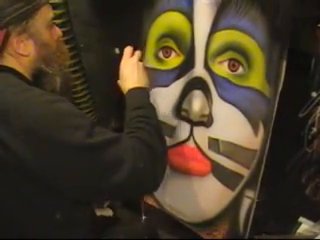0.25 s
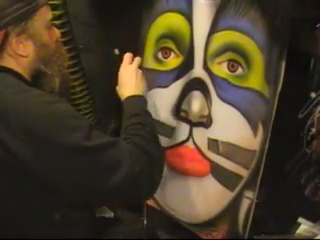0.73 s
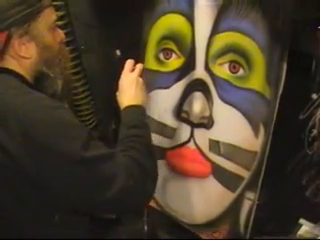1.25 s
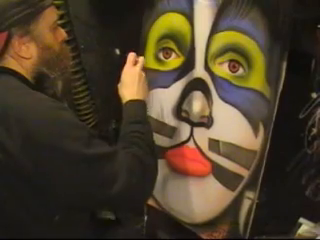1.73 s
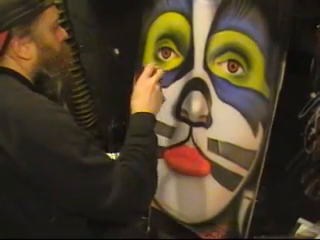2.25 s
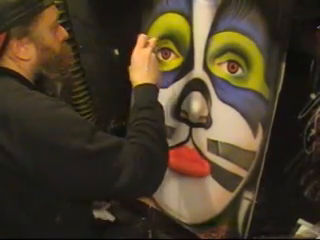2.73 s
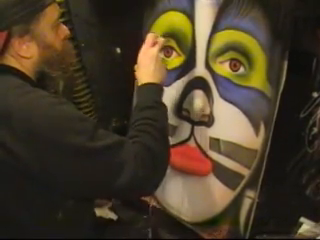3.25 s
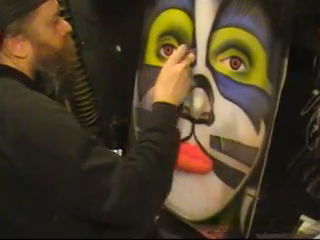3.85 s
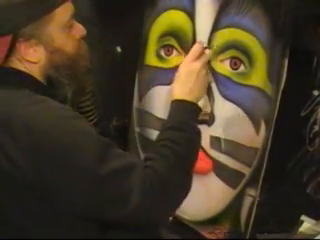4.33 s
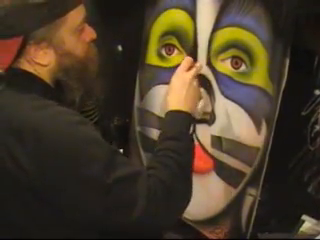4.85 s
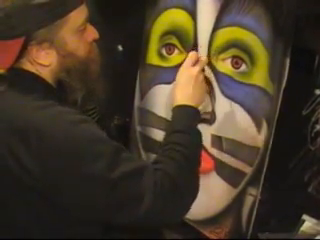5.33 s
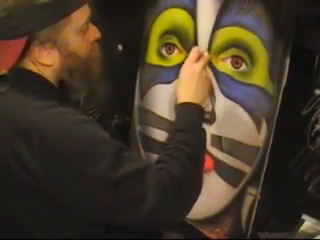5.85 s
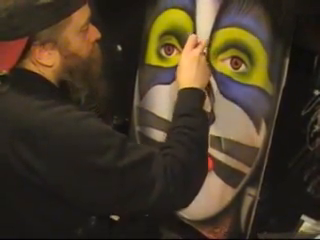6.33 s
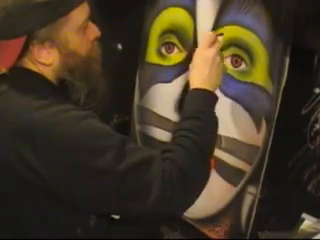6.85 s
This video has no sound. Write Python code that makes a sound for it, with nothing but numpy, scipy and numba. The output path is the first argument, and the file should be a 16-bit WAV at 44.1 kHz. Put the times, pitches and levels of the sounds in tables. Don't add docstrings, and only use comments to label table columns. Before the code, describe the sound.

The sound begins mid-stroke: an airbrush close to the microphone gives a bright, dense hiss, strongest in the upper treble, with a breathy roar and a wavering ring around the nozzle. The ring dips and surges several times a second as paint flow changes. Soft gusty drumming from the canvas accompanies it, mainly from 0 to 2 s. At about 2.25 s the air shuts off, bleeding away in under a tenth of a second, and snaps back at 2.45. It stops again at 3.5; a short, duller spit comes at 3.85, then a fuller, louder stroke from 3.95, fluctuating until 5.75. After a gap of about 0.2 s the final stroke starts at 5.95 and continues through the end near 7.1 s, swelling slightly. Beneath everything lie a low uneven fan rumble, faint air noise and a thin tape-motor whine, in a small room with a very short tail.

```python
import sys
import numpy as np
from scipy import signal
from scipy.fft import rfft, irfft
from scipy.io import wavfile
from scipy.ndimage import uniform_filter1d, map_coordinates
from numba import njit

SR = 44100
rng = np.random.default_rng(int(sys.argv[2]) if len(sys.argv) > 2 else 0)


def linear_from_db(decibels):
    return 10 ** (np.asarray(decibels, float) / 20)


def master_out(mix):
    frames = np.transpose(np.atleast_2d(mix))
    ceiling = np.clip(frames, -1, 1)
    pcm = np.round(ceiling * 32767).astype(np.int16)
    wavfile.write(sys.argv[1], SR, pcm)


N = 312655

# (time [s], air level [dB])
FACING = [(0, -26), (.9, -27), (1.5, -26), (1.7, -27.5), (2.2, -25), (2.55, -24.5), (2.72, -27),
          (3.6, -24.5), (3.97, -22), (4.5, -21.5), (4.97, -24), (5.15, -22.5), (5.5, -23), (5.7, -22),
          (6, -24.5), (6.45, -22.5), (6.7, -24), (7.06, -20.5)]
# (time [s], cap resonance [Hz], lower crest [Hz], upper crest [Hz])
HAND = [(0, 4500, 6040, 9100), (.75, 4680, 6240, 9400), (.95, 4700, 6340, 10500), (1.7, 4560, 6400, 10200),
        (2.2, 4785, 7350, 9950), (2.7, 4600, 6200, 9000), (3.5, 4600, 6700, 10240), (4, 4380, 6570, 9970),
        (4.3, 4200, 5830, 10200), (4.55, 4470, 6800, 10360), (4.95, 4395, 6460, 9900),
        (5.33, 4480, 6330, 10150), (5.52, 4530, 6960, 10300), (5.75, 4500, 6560, 9450),
        (6.1, 4660, 7200, 9850), (6.4, 4740, 6180, 10400), (6.6, 4710, 7110, 10220),
        (7.09, 4400, 6790, 9540)]
# (frequency [Hz], level per Hz [dB])
AIR_COLOUR = [(300, -35.5), (700, -21.5), (1400, -14), (2500, -11.5), (3300, -11.5), (3700, -11.5),
              (4300, -10.5), (5600, -4.5), (6500, -4), (8000, -2), (10000, -5), (11500, -12), (13500, -29)]
# (frequency [Hz], relative level [dB])
SIDE_COLOUR = [(60, -6), (110, -7), (200, 6), (360, 4), (660, -20), (1200, -50), (2180, -36), (3960, -12.5),
               (7210, -26), (13100, 0)]
# (frequency [Hz], width [Hz], level against the roar [dB])
HOLLOWS = [(1876, 230, -12.5), (3140, 910, -9.5)]
BODY_ECHOES = [
    (423, 78, 0.047),
    (609, 47, -0.11),
    (817, 21, 0.14),
]
CAP_DB, CAP_SLOPE, ROAR_DB, ROAR_SLOPE = -2, -0.98, -6.5, -0.52
AIR_SHARE, ROAR_SHARE = 0.059, 0.25
CREST_DB, CREST_SLOPE = 1.44, 0.27
SHIMMER_DB, WANDER = 1.0, 0.018
NEAR_MM, NEAR_SWAY_MM, NEAR_SHARE = 260, 14, 0.16


def jet(t):
    flow_db = np.interp(t, *np.transpose(FACING))
    lost_db = easing(t)
    gain_db = flow_db + 26
    air_db = flow_db - AIR_SHARE * lost_db + 0.37 * walk(10)
    cap_db = CAP_DB + CAP_SLOPE * gain_db - lost_db + surge(t)
    roar_db = ROAR_DB + ROAR_SLOPE * gain_db - ROAR_SHARE * lost_db
    time, *pitches = np.transpose(HAND)
    cap_hz, low_hz, up_hz = (np.interp(t, time, pitch) for pitch in pitches)
    low_db, up_db = (CREST_DB + CREST_SLOPE * gain_db + SHIMMER_DB * walk(9) for _ in range(2))
    low_hz, up_hz = (hz * (1 + WANDER * walk(7)) for hz in (low_hz, up_hz))

    high = shape([(3700, -33), (4900, -3.5)])
    air = shape(AIR_COLOUR)
    hiss = unit(noise(air * high))
    hiss = crest(hiss, low_hz, 2.1 * low_db, 520.)
    hiss = crest(hiss, up_hz, 2.1 * up_db, 560.)
    hiss = crest(hiss, (low_hz + up_hz) / 2, 0.3 * (low_db + up_db), 600.)
    hiss = unit(hiss + NEAR_SHARE * later(hiss, NEAR_MM + NEAR_SWAY_MM * walk(6)))
    hiss *= linear_from_db(-0.3 * (low_db + up_db))

    hollows = sum(linear_from_db(db) * ring(hz, width) for hz, width, db in HOLLOWS)
    hollows *= linear_from_db(0.99 * (air_db + 20.5))
    roar = unit(noise(air * (1 - high))) + hollows
    mid = linear_from_db(0.5 * walk(24.98)) * hiss + linear_from_db(roar_db + 0.32 * walk(20)) * roar

    cap = ring(cap_hz * (1 + 0.017 * walk(8)), 960) + linear_from_db(-9.5) * ring(3153, 520)
    mid += linear_from_db(cap_db - 4 + walk(18)) * cap
    mid = mid + sum(share * later(mid, mm + sway * walk(2.5)) for mm, sway, share in BODY_ECHOES)
    side = linear_from_db(-16) * unit(noise(air * shape(SIDE_COLOUR))) + 0.25 * np.gradient(mid)
    eddies = linear_from_db(0.38 * walk(900))
    return linear_from_db(air_db + 1.5) * pressure(t) * eddies * np.array([mid, side])


# (down [s], up [s], bleed t60 [s])
TRIGGER = [
    (-.1, 2.255, 0.092),
    (2.434, 3.529, 0.085),
    (3.959, 5.742, 0.067),
    (5.956, 7.196, 0.092),
]


def pressure(t, rise_s=0.0033):
    out = np.zeros(N)
    for down, up, t60 in TRIGGER:
        opening = 1 - np.exp(-np.maximum(t - down, 0) / rise_s)
        out += opening * linear_from_db(-60 * np.maximum(t - up, 0) / t60)
    return out


# (easing [s], back [s], cap ring lost [dB])
EASE = [(-.2, .16, 4), (0.196, 0.28, 5), (.4, 0.533, 3), (0.786, 0.915, 8.5), (1.132, 1.274, 8.5),
        (1.38, 1.53, 3), (1.517, 1.745, 8), (2.153, 2.3, 5.5), (2.35, 2.458, 2), (2.62, 2.723, 5.5),
        (3.024, 3.182, 3.5), (3.27, 3.327, 4), (3.398, 3.554, 3.5), (3.9, 4.048, 1.5), (4.1, 4.2, 10),
        (4.39, 4.517, 4), (4.65, 4.8, 3.5), (4.748, 5, 7), (5.175, 5.27, 9), (5.44, 5.5, 10),
        (5.71, 5.8, 14), (5.897, 6.092, 5), (6.24, 6.324, 7), (6.3, 6.5, 0.5), (6.503, 6.64, 8.5),
        (6.745, 7.198, 0.5)]
EASE_S, BACK_S = 0.058, 0.034
SURGE, SURGE_S = 0.18, 0.057


def easing(t):
    losses = []
    for start, back, db in EASE:
        closing = (t - start) / EASE_S
        reopening = 1 + (back - t) / BACK_S
        losses.append(db * np.clip(np.minimum(closing, reopening), 0, 1))
    return np.max(losses, axis=0)


def surge(t):
    out = np.zeros(N)
    for _, back, db in EASE:
        out += SURGE * db * (t > back) * np.exp(-np.abs(t - back - BACK_S) / SURGE_S)
    return out


# (frequency [Hz], width [Hz], level [dB])
CLOTH_MODES = [
    (239, 126, 0),
    (344, 317, 6),
    (636, 99, 0.5),
    (804, 320, 0.5),
    (1048, 150, -0.5),
]
# (middle [s], length [s], level [dB], upper
# modes [dB])
PUSHES = [(0, .12, -49, -11), (0.306, 0.45, -35.5, 9), (0.515, 0.21, -38, 2), (0.738, 0.35, -36.5, 6.5),
          (1.019, 0.24, -39, -6), (1.375, 0.23, -42, -8), (1.821, 0.36, -41, -1), (2.295, 0.13, -50, -17),
          (2.795, 0.17, -59, -22), (3.162, .25, -53, -12), (3.572, 0.065, -51, -14),
          (3.99, 0.073, -53, -16), (4.355, 0.11, -60, 11), (5.79, .07, -52, -11), (6.79, 0.14, -65, 15)]
GRAZE_DB, GRAZE_UPPER_DB = -57, 10.5


def canvas(t):
    push = np.array([linear_from_db(db) * swell(t, middle, length) ** 2 for middle, length, db, _ in PUSHES])
    graze = linear_from_db(GRAZE_DB) * pressure(t)
    low, upper = (unit(sum(linear_from_db(db) * ring(hz, width) for hz, width, db in modes))
                  for modes in (CLOTH_MODES[:2], CLOTH_MODES[2:]))
    near = push.sum(axis=0) + graze
    nearer = linear_from_db(np.array(PUSHES)[:, 3]) @ push + linear_from_db(GRAZE_UPPER_DB) * graze
    mid = near * low + linear_from_db(-5) * nearer * upper
    side = linear_from_db(-18) * near * ring(350, 900)
    gusts = linear_from_db(0.84 * walk(40))
    return gusts * np.array([mid, side])


# (time [s], peak level [dB], t60 [s])
SPIT = [
    (3.83, -22.5, 0.075),
]
# (frequency [Hz], level per Hz [dB])
SPIT_COLOUR = [(290, -46), (500, -21), (1780, -9.5), (2860, -8.5), (3460, -12), (5430, -16.5), (10200, -28),
               (13000, -67)]
# (frequency [Hz], width [Hz], lift [dB])
SPIT_RINGS = [(1050, 250, 5), (2100, 250, 5.5), (2850, 310, 4.5), (4900, 700, 5.5)]


def spit(t):
    burst = np.zeros(N)
    for start, db, t60 in SPIT:
        age = np.maximum(t - start, 0)
        burst += linear_from_db(db - 60 * age / t60) * (1 - np.exp(-age / 0.0016))
    burst *= linear_from_db(2 * walk(500))
    colour = shape(SPIT_COLOUR)
    puff = noise(colour)
    for hz, width, db in SPIT_RINGS:
        puff = crest(puff, hz * np.ones(N), db, 1. * width)
    scatter = linear_from_db(-16) * unit(noise(colour * shape(SIDE_COLOUR)))
    return burst * np.array([unit(puff), scatter])


def walls(x, t60=0.088, wet_db=-17):
    age = np.arange(SR // 2) / SR
    tail = rng.standard_normal((2, len(age))) * linear_from_db(-60 * age / t60) * (age > 0.004)
    tail *= linear_from_db(wet_db) / np.sqrt(np.sum(tail ** 2, axis=1, keepdims=True))
    return signal.fftconvolve(x[None], tail * [[1], [0.4]], axes=1)[:, :N]


# (frequency [Hz], level per Hz [dB])
ROOM_COLOUR = [(18, -40), (32, -21), (45, -21), (100, -10), (150, -13), (200, -15), (290, -22), (700, -24),
               (1300, -29), (4000, -29), (9000, -32), (11000, -36), (13500, -58)]
# (frequency [Hz], side against mid [dB])
PORTS = [(100, -1), (1000, 0), (2500, -9), (5000, -8), (8000, 0)]
# (frequency [Hz], width [Hz], level [dB])
FAN = [(54, 14, -55.5), (37.2, 9.3, -61), (185.2, 8.6, -62), (372, 3.8, -69)]
# (middle [s], length [s], frequency [Hz], level [dB])
SWELLS = [(.2, 0.48, 56.2, -46), (0.474, 0.26, 54, -46.5), (1.15, 1, 50.4, -46), (1.82, .25, 52.3, -54),
          (2.06, .16, 54, -52), (2.258, .2, 50.3, -52), (2.47, 0.22, 50.7, -43), (2.95, 1, 53.76, -46),
          (3.55, 0.58, 54.2, -42), (4.049, 0.95, 54.75, -44), (4.953, 0.95, 55.85, -45.5),
          (5.47, 0.24, 49.2, -50), (5.704, 0.38, 53.2, -44.5), (5.95, 0.55, 52.7, -52),
          (6.394, 0.8, 56.5, -45), (6.91, .14, 58.7, -45), (7.06, .12, 53.6, -43)]
# (frequency [Hz], level [dB])
WHINE = [(578.7, -57), (868, -71), (1157.4, -70), (8450, -72)]
ROOM_DB = -51.5


def studio(t):
    middle, _, shaft_hz, _ = np.transpose(SWELLS)
    fan = np.max([linear_from_db(db) * swell(t, centre, length) for centre, length, _, db in SWELLS], axis=0)
    fan *= np.sin(2 * np.pi * np.cumsum(np.interp(t, middle, shaft_hz)) / SR)
    fan += sum(linear_from_db(db) * ring(hz, width) for hz, width, db in FAN)
    room = shape(ROOM_COLOUR)
    mid = fan + linear_from_db(ROOM_DB) * unit(noise(room))
    side = linear_from_db(ROOM_DB - 2.5) * unit(noise(room * shape(PORTS))) - 0.13 * fan
    side += sum(linear_from_db(db) * np.sin(2 * np.pi * hz * t) for hz, db in WHINE)
    return np.array([mid, side])


def unit(x):
    return x / np.sqrt(np.mean(x ** 2))


def shape(points):
    hz, db = np.transpose(points)
    grid_hz = np.arange(N // 2 + 1) * SR / N
    return linear_from_db(np.interp(np.log(grid_hz + 1), np.log(np.maximum(hz, 1)), db))


def noise(gain):
    return irfft(rfft(rng.standard_normal(N)) * gain, N)


def walk(rate):
    hold = int(SR / rate)
    steps = np.repeat(rng.standard_normal(N // hold + 1), hold)
    return unit(uniform_filter1d(uniform_filter1d(steps, hold), hold)[:N])


@njit
def svf(x, hz, width):
    y, band, low = np.empty(len(x)), 0., 0.
    for i in range(len(x)):
        g = np.tan(np.pi * hz[i] / SR)
        damping = width / hz[i]
        v = (band + g * (x[i] - low)) / (1 + g * (g + damping))
        band = 2 * v - band
        low = low + 2 * g * v
        y[i] = damping * v
    return y


def ring(hz, width):
    hz = hz * np.ones(N)
    once = svf(rng.standard_normal(N), hz, 1. * width)
    return unit(svf(once, hz, 1. * width))


def crest(x, hz, db, width):
    return x + (linear_from_db(db) - 1) * svf(x, hz, width)


def later(x, path_mm):
    return map_coordinates(x, [np.arange(N) - path_mm / 343000 * SR], order=3)


def swell(t, middle, length):
    return np.cos(np.pi * np.clip((t - middle) / length, -0.5, 0.5))


def scene():
    t = np.arange(N) / SR
    near = jet(t) + spit(t) + canvas(t)
    mid, side = near + walls(near[0]) + studio(t)
    return np.array([mid + side, linear_from_db(0.8) * (mid - side)])


def top_cut(x):
    return signal.sosfilt(signal.butter(12, 13720, fs=SR, output="sos"), x)


def record(dry, drum_hz=150.03):
    hz = np.arange(N // 2 + 1) * SR / N
    turn = np.exp(-2j * np.pi * hz / drum_hz - (hz / 15000) ** 4)
    notch = (1 - 0.96 * turn) / (1 - 0.5 * turn)
    notch = np.where(hz < drum_hz / 2, 1, 0.84 * notch)
    mix = irfft(rfft(dry) * notch, N)
    return top_cut(mix)


dry = scene()
out = record(dry)
master_out(out)
```